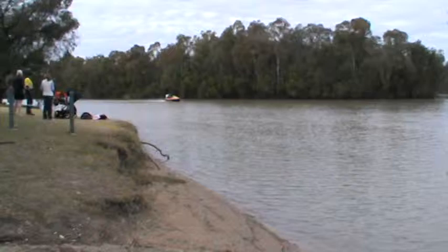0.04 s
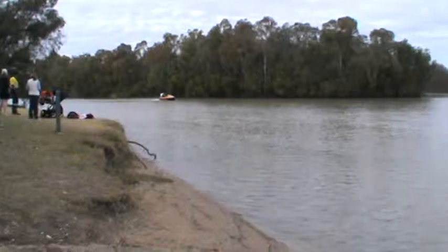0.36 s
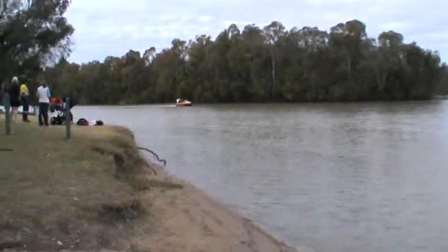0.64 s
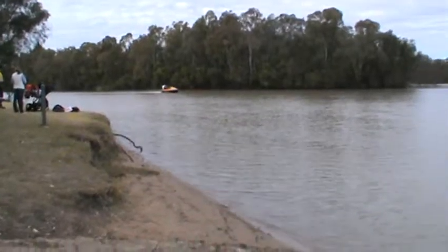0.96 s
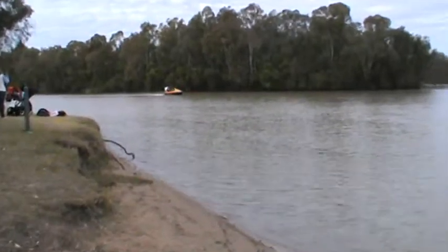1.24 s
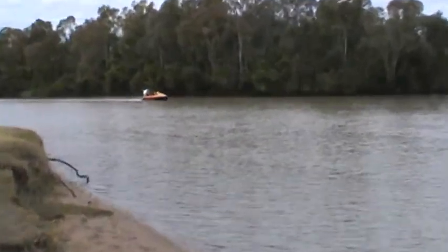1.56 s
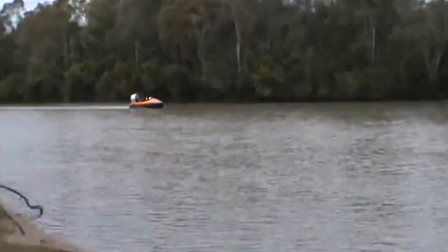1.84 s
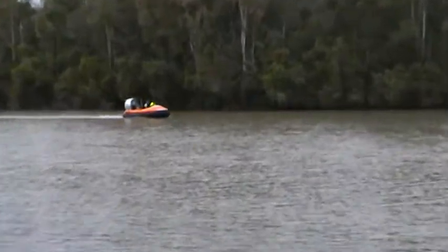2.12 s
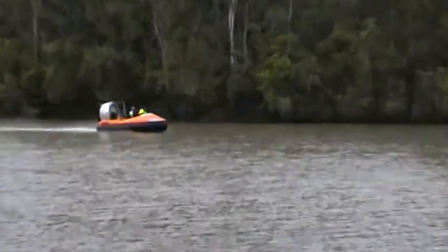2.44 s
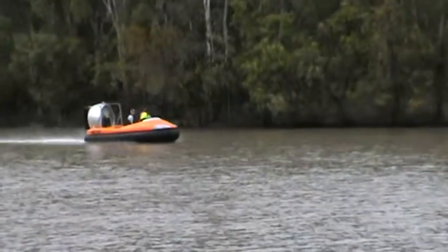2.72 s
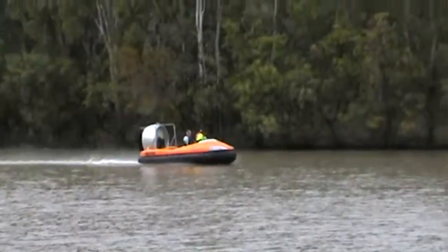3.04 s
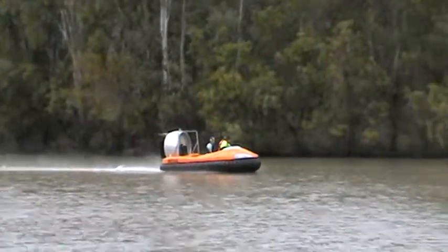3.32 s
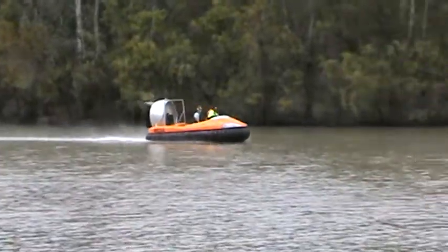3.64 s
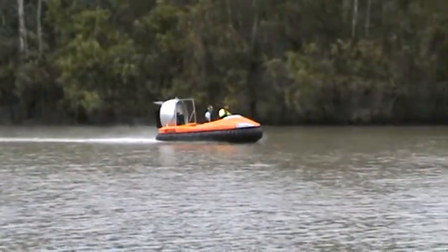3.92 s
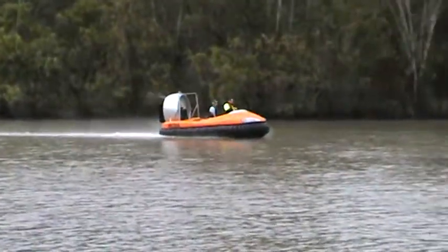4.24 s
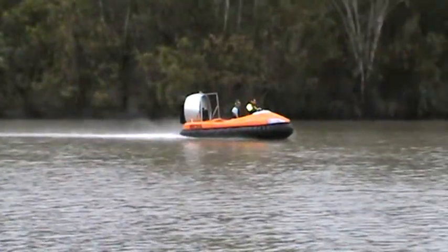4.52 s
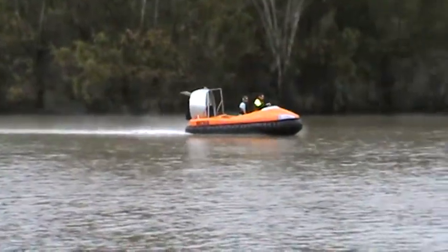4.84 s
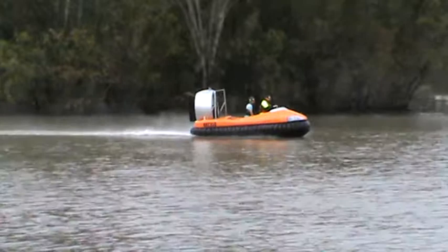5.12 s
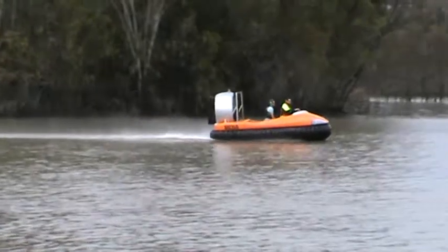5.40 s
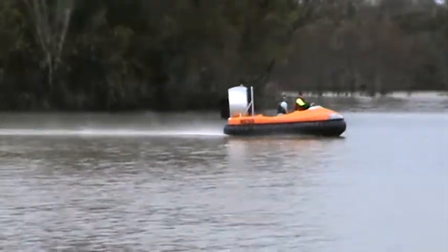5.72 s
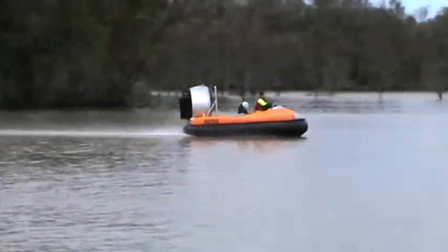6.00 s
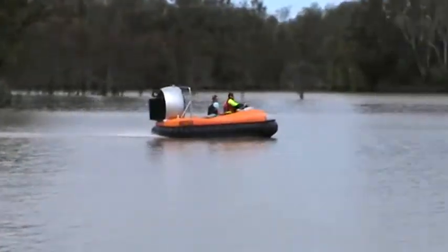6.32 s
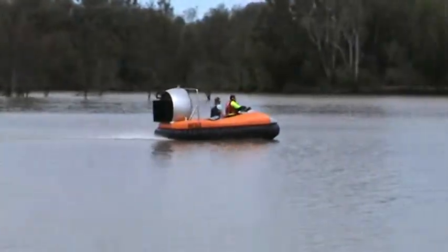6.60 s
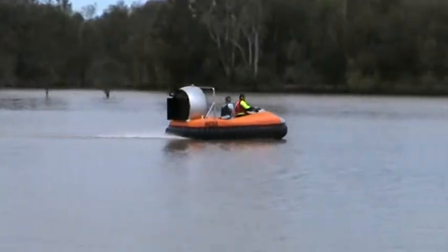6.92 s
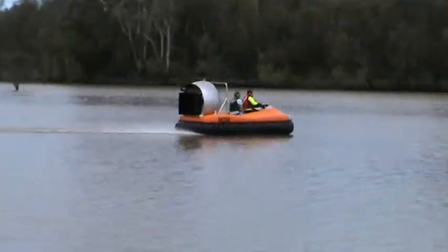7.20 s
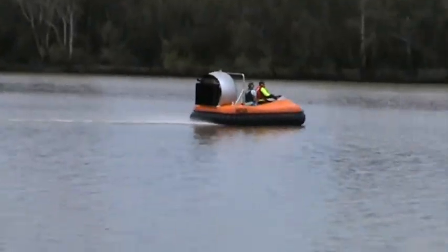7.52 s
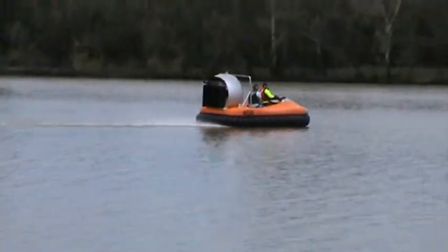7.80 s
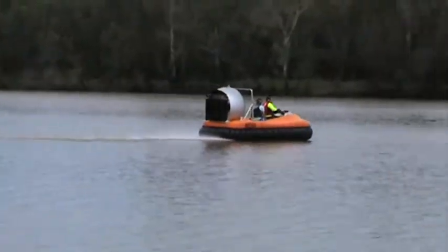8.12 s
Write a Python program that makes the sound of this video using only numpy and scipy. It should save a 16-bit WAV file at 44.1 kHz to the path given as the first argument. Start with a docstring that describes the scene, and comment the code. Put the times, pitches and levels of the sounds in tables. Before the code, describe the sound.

A small hovercraft is running on a lake from the start, heard in stereo from the bank. For the first four and a half seconds it approaches with a steady, buzzing engine drone and fan hum, wavering slightly, along with rushing air and a thin hiss of spray. A few tiny ticks sound right at the microphone during the first three seconds. Between about 4.5 and 5.5 seconds the craft passes and its pitch dips slightly. The rasp and hiss recede, leaving a smoother fan hum in front until about 7 seconds, while a deeper engine boom builds. From around 7.5 seconds the throttle opens, the pitch climbs clearly and the rush of air returns as the craft heads away, still running at the end near 8.4 seconds. Throughout, the wooded shore adds a soft, short echo and a light breeze rumbles faintly on the microphone.

```python
"""A small hovercraft crosses a lake, passes a stereo microphone on the bank and throttles up going away.
Its engine drives a four-blade ducted fan through a belt, so two unrelated stacks of tones glide together.
Each source beams its own way: the balance shifts as the craft shows us its bow, its side, then its stern.
Air rushes through the duct, spray hisses, moving air makes it waver and the wooded shore echoes it.
Right at the microphone are a light breeze, a few ticks of the case and a faint electronic whistle."""
import sys
import numpy as np
from scipy import signal
from scipy.fft import rfft, irfft
from scipy.io import wavfile
from scipy.ndimage import uniform_filter1d, minimum_filter1d

SR = 44100
rng = np.random.default_rng(int(sys.argv[2]) if len(sys.argv) > 2 else 0)


def materialize(psi):
    """Save the field psi as 16-bit PCM at rate SR to the path in sys.argv[1].

    A 1-D psi becomes a single channel; in a 2-D psi each row is a channel.
    """
    bounded = np.clip(np.atleast_2d(psi).T, -1, 1)
    quanta = np.round(bounded * 32767).astype(np.int16)
    wavfile.write(sys.argv[1], SR, quanta)


N = 368235
TIME = np.arange(N) / SR
FREQS = np.maximum(np.arange(N // 2 + 1) * SR / N, 1)


def undb(db):
    """Decibels to gain."""
    return 10 ** (np.asarray(db) / 20)

def bump(s, half_length):
    """A smooth rise to 1 at time s and back."""
    return np.exp(-((TIME - s) / half_length) ** 2)

def over_frequency(table):
    """Each column of a frequency table, bin by bin."""
    hz, *columns = np.transpose(table)
    return [np.interp(np.log(FREQS), np.log(np.sort(hz)), c) for c in columns]

def noise(colour, column=0):
    """Unit noise coloured by rows of Hz and dB, falling away steeply above the last row."""
    gain = undb(over_frequency(colour)[column]) * np.minimum(colour[-1][0] / FREQS, 1) ** 2
    x = irfft(rfft(rng.standard_normal(N)) * gain, N)
    return x / x.std()

def walk(rate):
    """A smooth random drift of unit spread that changes about rate times a second."""
    count = 4096
    hz = np.arange(count // 2 + 1) * SR / N
    x = irfft(rfft(rng.standard_normal(count)) / (1 + (hz / rate) ** 2), count)
    return np.interp(np.linspace(0, count - 1, N), np.arange(count), x / x.std())

def tone(phase, scatter):
    """A unit tone from across the lake: a direct path plus a share scattered by ripples and moving air."""
    path = 1 + scatter * (walk(6) + 1j * walk(6))
    start = rng.uniform(0, 2 * np.pi)
    return np.sqrt(2 / (1 + 2 * scatter ** 2)) * np.real(path * np.exp(1j * (phase + start)))

def stack(phase, orders, scatter):
    """Tones locked to one turning part."""
    return sum(undb(db) * tone(order * phase, scatter) for order, db in orders)

def line_whistle(hz=15625, level_db=-75):
    """The camcorder's own electronics whistle faintly."""
    return undb(level_db) * np.sin(2 * np.pi * hz * TIME)

def breeze(level_db):
    """Light wind rumbles right on the microphone."""
    return undb(level_db) * noise([(20, -20), (65, -1.5), (110, -2), (200, -5.5), (600, -29)])

# The camcorder's case, next to the microphone. Each row: start in seconds, peak level in dB.
CASE_TICKS = [(0.2937, -43), (0.3955, -29.5), (1.3444, -37.5), (2.528, -40), (2.533, -36), (2.885, -32)]
def case_clicks(decay_s=0.0012):
    """Tiny bright ticks of the case that die within a few milliseconds."""
    envelope = sum(undb(db) * np.exp(-np.abs(TIME - s) / decay_s) * (TIME >= s) for s, db in CASE_TICKS)
    return envelope * noise([(3000, -32), (7000, -2), (10000, 9), (15500, -9)])

# The stereo pair on the bank. Each row: frequency in Hz, left minus right in dB, left lead in radians.
PORT_BALANCE = [(50, -8, -.65), (160, -6.5, -.66), (265, -4.8, -.69), (330, -3.3, -.62), (500, -.3, -.1),
                (700, 1.2, -.1), (1200, -.3, -.2), (1500, 0, .25), (2600, .8, -.15), (3800, 2.2, .3),
                (5200, 2, .25), (6500, 1, -.2), (8000, .3, 0), (15000, 0, 0)]
def microphone_ports(x):
    """Close-set ports turn a small delay into a level and phase difference, mostly in the bass."""
    pan_db, lead = over_frequency(PORT_BALANCE)
    left = undb(pan_db / 2) * np.exp(.5j * lead)
    pair = np.array([left, 1 / left])
    return irfft(rfft(x) * pair / np.abs(pair.mean(axis=0)), N)

def shore_echo(x, t60_s=0.48, delay_s=0.04, level_db=-13):
    """A diffuse echo from the trees along the shore, different at each port."""
    t = TIME[:SR]
    tail = rng.standard_normal((2, SR)) * undb(-60 * t / t60_s) * (t > delay_s)
    tail /= np.sqrt(np.sum(tail ** 2, axis=1, keepdims=True))
    # leaves scatter the shorter waves and let the bass through
    scattered = signal.sosfilt(signal.butter(1, [600, 12000], "bandpass", fs=SR, output="sos"), x)
    return undb(level_db) * signal.fftconvolve(scattered[None], tail, axes=1)[:, :N]

# The craft seen from the bank. Each row: time in seconds, angle off the bow in degrees.
VIEW_ANGLES = [(0.1, 9.8), (0.9, 24.2), (4.6, 64.8), (5.3, 84.6), (6.8, 104.6), (8.35, 139.7)]
def heading():
    """The side that faces the microphone: 0 degrees is the bow, 90 broadside, 180 the stern."""
    return np.interp(TIME, *np.transpose(VIEW_ANGLES))

def towards_bank(beam):
    """Gain of a source as its flat-topped lobes (+dB) and shadows (-dB) sweep over the microphone."""
    all_round_db, lobes = beam
    angle = heading()
    return undb(all_round_db + sum(db * np.exp(-((angle - aim) / width) ** 4) for aim, width, db in lobes))

def bow_to_stern(colour, bow_deg=16.7, stern_deg=105):
    """Unit noise that passes from its bow colour to its stern colour as the craft goes by."""
    stern = np.clip((heading() - bow_deg) / (stern_deg - bow_deg), 0, 1)
    return np.sqrt(1 - stern) * noise(colour) + np.sqrt(stern) * noise(colour, column=1)

# The treble at the bank. Each row: centre in seconds, half-length in seconds, change in dB.
TREBLE_SWELLS = [(0.1, 0.16, -1), (1.15, 0.097, 0.5), (2.488, 0.15, 3), (3.1, 0.11, -1.5),
                 (3.363, 0.12, 1.8), (3.78, 0.33, 1.9), (4.073, 0.067, -2.5), (4.343, 0.092, 1.1),
                 (6.55, 0.14, 1.5), (6.78, .08, -1.5)]
def treble_swell():
    """A gain that makes the treble swell or sink briefly."""
    return undb(sum(db * bump(s, half) for s, half, db in TREBLE_SWELLS))

# Spray out on the lake. Each row: frequency in Hz, relative dB from the bow, then from the stern.
SPRAY_COLOUR = [(3500, -15, -15), (5500, 2.5, 0), (6160, 4.5, 1.5), (7060, 1, -1.5), (8440, 2.5, 1.5),
                (9100, -2.5, -4), (10200, -0.5, -1), (11300, -7.5, -6), (13000, -16, -17),
                (14500, -21, -25), (15800, -21, -27)]
# Every PATTERN is an all-round level in dB, then lobes.
# Each row: direction off the bow in degrees, half-width in degrees, gain in dB.
SPRAY_PATTERN = -43.5, [(102.5, 17.7, -7.3)]
def spray(far_loss_db=6, approach_s=4.1):
    """Spray hisses; the air swallows some of it at a distance, less as the craft draws near."""
    far = np.clip(1 - TIME / approach_s, 0, 1)
    return bow_to_stern(SPRAY_COLOUR) * towards_bank(SPRAY_PATTERN) * undb(-far_loss_db * far)

# The hiss of the air stream. Each row: frequency in Hz, relative dB from the bow, then from the stern.
HISS_COLOUR = [(1100, -30, -22), (1500, -9, -7), (1880, 1, 2.5), (2220, 0.5, 0.5), (2730, 1, -1.5),
               (3070, 1.5, 1), (3550, -2, -3.5), (3860, -1.5, 0.5), (4000, -5, -4), (4600, -2, -4),
               (5300, -6.5, -6.5), (5560, -15, -14), (7540, -38, -31)]
# Its peaks. Each row: centre in seconds, half-length in seconds, frequency in Hz, dB against the hiss.
HISS_BANDS = [(0.5, 0.27, 2540, -4), (1.7, 0.47, 2565, -8), (3.05, 0.33, 2940, -5)]
def air_hiss():
    """A broad hiss out of which narrow bands rise and fall on the approach."""
    band = np.sqrt(2) * noise([(90, -7), (170, -2), (400, -25)])
    peaks = sum(undb(db) * bump(s, half) * np.cos(2 * np.pi * hz * TIME) for s, half, hz, db in HISS_BANDS)
    return bow_to_stern(HISS_COLOUR) + band * peaks

# Air in the duct. Each row: frequency in Hz, relative level in dB (for the rasp: bow, then stern).
RUMBLE_COLOUR, RUSH_COLOUR, RASP_COLOUR = [(20, -32), (35, -34), (60, -18), (110, -6.5), (160, -1.5),
                                           (215, 3.5), (270, 1), (380, -4), (470, -6), (600, -15),
                                           (900, -53)], [(300, -28), (480, -10), (580, -3.5), (680, 0.5),
                                                           (800, -2), (890, -13), (1000, -26), (1200, -33),
                                                           (2000, -51)], [(684, -20.5, -21), (870, -1, 0.5),
                                                                         (1027, 2, 2), (1077, 3.5, 0.5),
                                                                         (1168, 0.5, -8), (1205, -15, -5.5),
                                                                         (1374, -6, -4), (1730, -15, -5),
                                                                         (1695, -9, -9), (2140, -39, -28.5),
                                                                         (3000, -39, -39)]
# Broadside on, the duct wall hides the air stream from the microphone.
RUMBLE_PATTERN = -21, [(116, 26.4, -6.5), (12, 13.4, -3)]
RUSH_PATTERN = -26, [(104.3, 17, -5), (43.7, 7.4, -1.5)]
RASP_PATTERN = -31.5, [(103, 18.3, -5.5), (17, 15, 3), (40.2, 12.3, -1.5)]
def airflow(firing, blade, hiss_gain):
    """Duct turbulence pulses with blades and firings; the breeze makes the treble flutter as one."""
    pulsing = 1 + 0.025 * np.cos(firing) + 0.031 * np.cos(blade)
    flutter = undb(0.41 * walk(6.4) + 0.88 * walk(46))
    rumble = noise(RUMBLE_COLOUR) * towards_bank(RUMBLE_PATTERN) * undb(0.92 * walk(14))
    rush = noise(RUSH_COLOUR) * towards_bank(RUSH_PATTERN) * undb(0.43 * walk(31))
    rasp = bow_to_stern(RASP_COLOUR) * towards_bank(RASP_PATTERN)
    treble = rasp + air_hiss() * hiss_gain + spray() * treble_swell()
    return rumble + pulsing * (rush + flutter * treble)

# The duct's resonances. Each row: frequency in Hz, gain in dB.
DUCT_RESPONSE = [(465, -8), (495, -2), (535, -0.5), (590, 7.5), (700, -2.5), (795, 2.5), (825, 0.5),
                 (880, -4), (935, -11.5), (1000, -13), (1075, -2), (1140, -3), (1200, -24), (1320, -16.5),
                 (1800, -23.5)]
def ducted(phase, orders, scatter):
    """Tones that swell and fade as their pitch crosses the duct's resonances."""
    hz = np.gradient(phase) * SR / (2 * np.pi)
    duct_hz, gain_db = np.transpose(DUCT_RESPONSE)
    shaped = [(order, db + np.interp(order * hz, np.sort(duct_hz), gain_db)) for order, db in orders]
    return stack(phase, shaped, scatter)

# The weaker exhaust tones. Each row: multiple of the firing rate, relative level in dB.
EXHAUST_TONES = [(5, -4.5), (6, 1), (7, -9.5), (8, -1), (9, 1.5), (11, 1)]
EXHAUST_TONES_PATTERN = -33, [(102.5, 9.3, -8), (20, 9.2, 5.5), (42.7, 5.8, -3), (148, 15, -1.5)]
BOOM_PATTERN = -22, [(150.3, 42.4, 9), (31.7, 6.2, -4), (86, 3.4, -6)]  # leaves astern
BARK_PATTERN = -36, [(42, 41, 17.5), (66, 14, 2.2), (133.3, 6.9, 8.8)]  # goes forward
BUZZ_PATTERN = -32.5, [(93, 19.6, -6), (140, 13, 3.5)]  # weak from the side
BLARE_PATTERN = -34.5, [(36.8, 28, 10.5), (123, 13, 4.2)]  # goes forward
def exhaust(firing, blade):
    """The engine's firing harmonics carry over the water; the fan chops the stream and adds sum tones."""
    boom = towards_bank(BOOM_PATTERN) * tone(firing, scatter=0.067)
    bark = towards_bank(BARK_PATTERN) * tone(2 * firing, scatter=0.1)
    buzz = towards_bank(BUZZ_PATTERN) * tone(3 * firing, scatter=0.12)
    blare = towards_bank(BLARE_PATTERN) * tone(4 * firing, scatter=0.09)
    chopped = sum(tone(p, scatter=0.49) for p in (firing + blade, 2 * firing + blade, firing + 2 * blade))
    overtones = ducted(firing, EXHAUST_TONES, scatter=0.14) + undb(-10) * chopped
    return boom + bark + buzz + blare + towards_bank(EXHAUST_TONES_PATTERN) * overtones

# Fan overtones and drive whine. Each row: multiple of the blade rate, relative level in dB.
FAN_TONES = [(2, 2), (3, -2), (4, -4.5), (4.251, -13)]
WHINE_TONES = [(9.53, -16), (10.55, -19.5), (11.54, -16), (12, -16.5), (14, -17.5), (14.5, -18)]
FAN_TONES_PATTERN = -39, [(22.5, 13, 7.5), (48, 5.7, -4.5), (122, 8, 4.5)]
HUM_PATTERN = -19.5, [(95.4, 20.4, 7), (140, 13, -5), (57, 5.9, -2)]  # loudest in the plane of the fan
WOBBLE_PATTERN = -45.5, [(39.4, 18, 15)]  # strongest off the bow
def fan(blade, hiss_gain):
    """Passing blades hum, unequal blades add quarter orders, and belt and blades whine thinly."""
    hum = towards_bank(HUM_PATTERN) * tone(blade, scatter=0.066)
    overtones = towards_bank(FAN_TONES_PATTERN) * ducted(blade, FAN_TONES, scatter=0.36)
    wobble = towards_bank(WOBBLE_PATTERN) * tone(2.75 * blade, scatter=0.33)
    whine = hiss_gain * stack(blade, WHINE_TONES, scatter=0.58)
    return hum + overtones + wobble + whine

# The fan's pitch from the bank: cruise, a Doppler drop as it passes, then the throttle opens.
# Each row: time in seconds, blade-passing rate in Hz.
BLADE_RATE = [(0.1, 269.2), (2.2, 268.6), (3.7, 269.2), (4.5, 267.8), (4.75, 264.9), (5.1, 258.0),
              (5.3, 255.5), (5.8, 254.8), (6.5, 257.1), (7.55, 260.3), (7.7, 263.6), (7.95, 283.6),
              (8.15, 295.5), (8.35, 301)]
HISS_PATTERN = -35, [(102.8, 19.7, -7.5), (67, 7, -1.5)]  # shared by hiss and whine
def hovercraft(firings_per_blade=163.4 / 268.8):
    """The belt locks engine and fan together, so one speed sets the phase of both."""
    blade_hz = np.interp(TIME, *np.transpose(BLADE_RATE)) * (1 + 0.0004 * walk(6.6))
    blade = 2 * np.pi * np.cumsum(blade_hz) / SR
    firing = firings_per_blade * blade
    hiss_gain = towards_bank(HISS_PATTERN) * treble_swell()
    return exhaust(firing, blade) + fan(blade, hiss_gain) + airflow(firing, blade, hiss_gain)

def scene():
    """From the bank: the craft out on the water, its echo in the trees, a breeze on the microphone."""
    craft = hovercraft()
    direct = microphone_ports(craft + case_clicks() + breeze(level_db=-41))
    breeze_per_port = np.array([breeze(level_db=-47) for _ in range(2)])
    return direct + shore_echo(craft) + breeze_per_port + line_whistle()

def record(dry, start_s=0.08, fade_s=0.021, ceiling=0.82, top_hz=15750):
    """The microphone fades in quickly; a limiter ducks both channels at peaks and the top is cut."""
    opened = dry * np.clip((TIME - start_s) / fade_s, 0, 1)
    gain = ceiling / np.maximum(np.abs(opened).max(axis=0), ceiling)
    smooth_gain = uniform_filter1d(minimum_filter1d(gain, size=901), size=901)  # 20 ms windows
    lowpass = signal.ellip(10, .1, 80, top_hz, fs=SR, output="sos")
    return signal.sosfilt(lowpass, opened * smooth_gain)


dry = scene()
out = record(dry)
materialize(out)
```